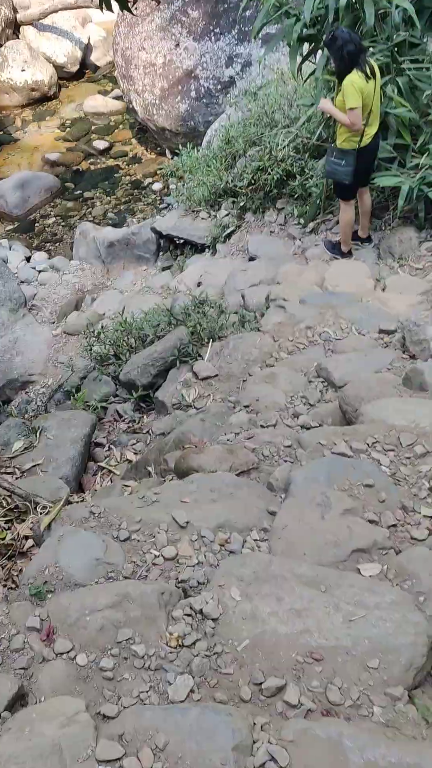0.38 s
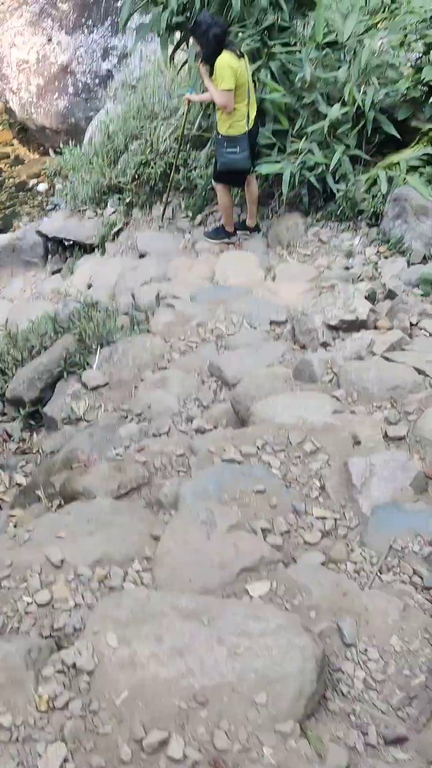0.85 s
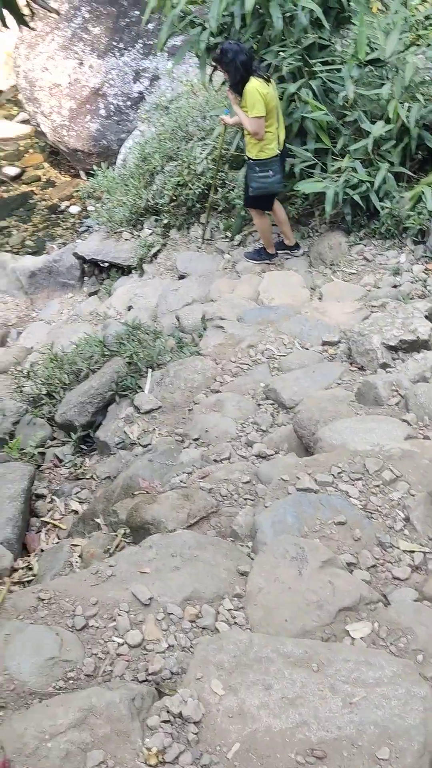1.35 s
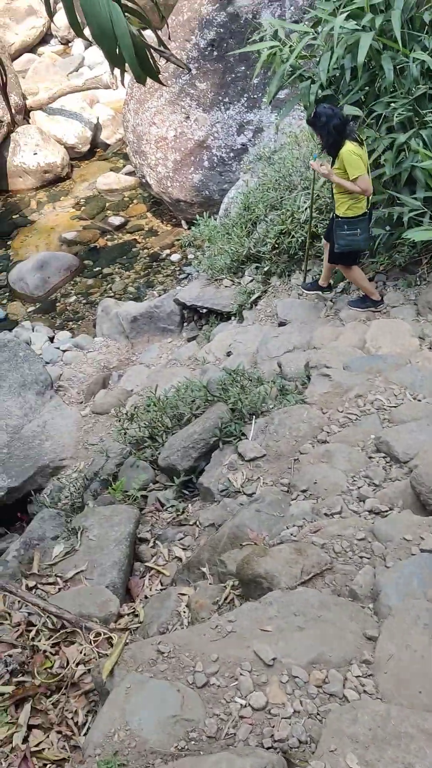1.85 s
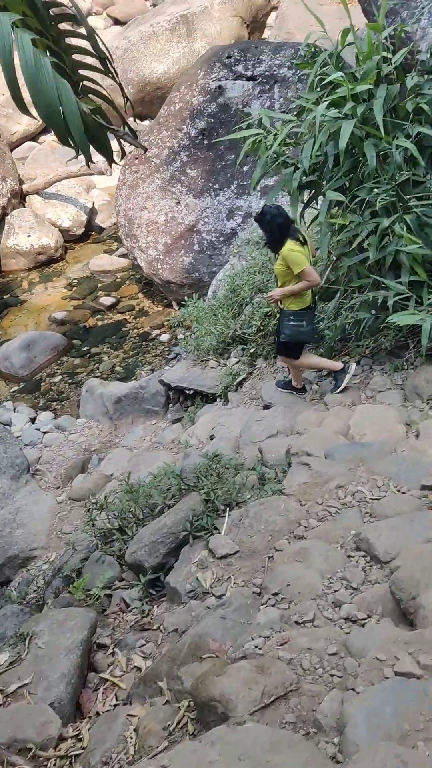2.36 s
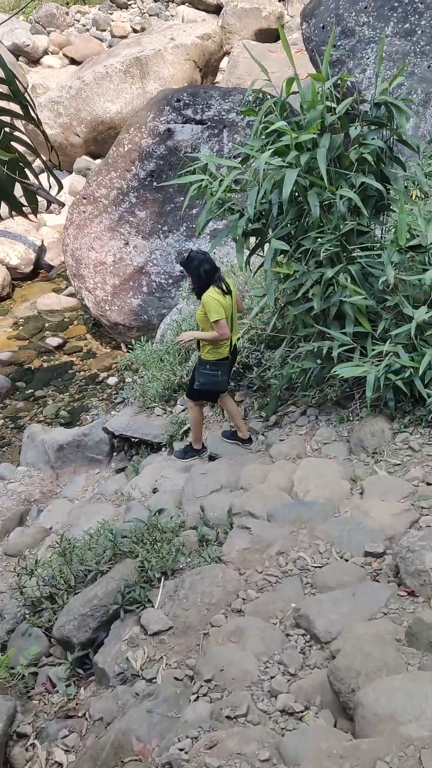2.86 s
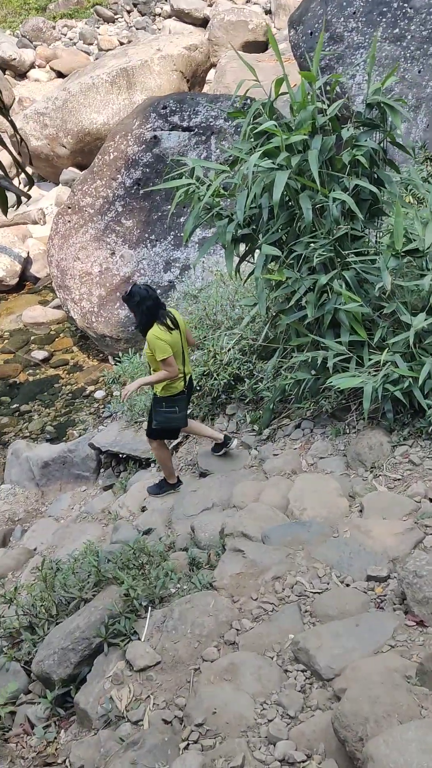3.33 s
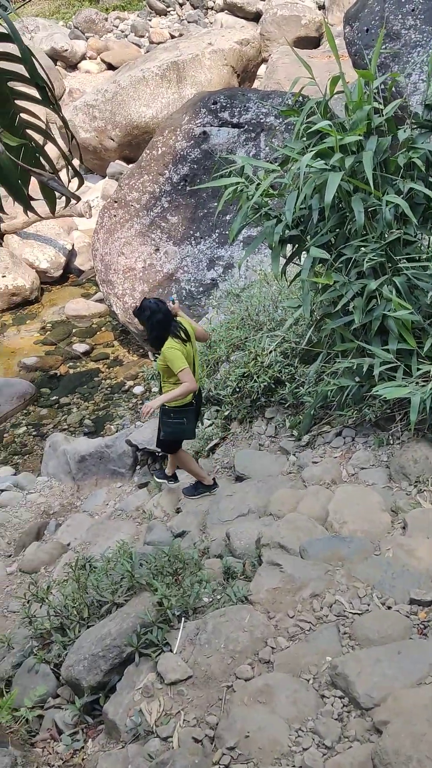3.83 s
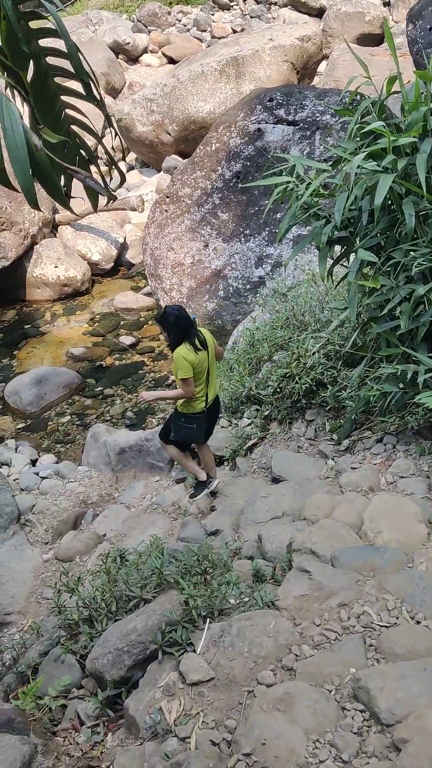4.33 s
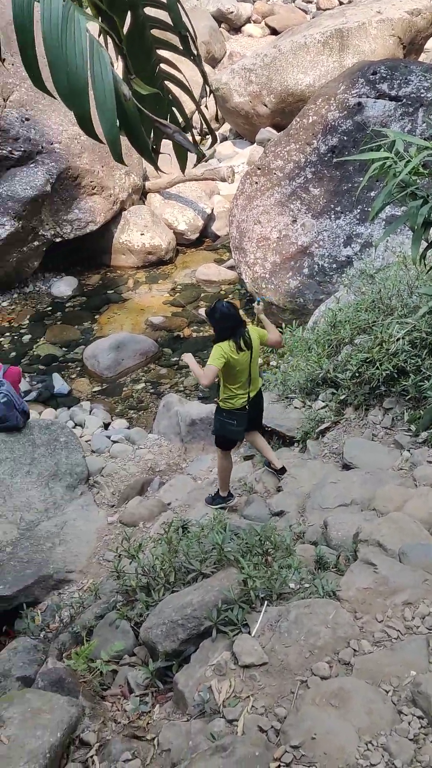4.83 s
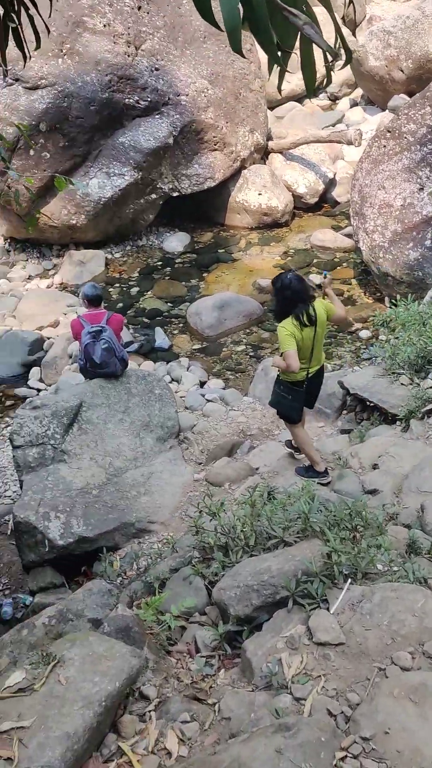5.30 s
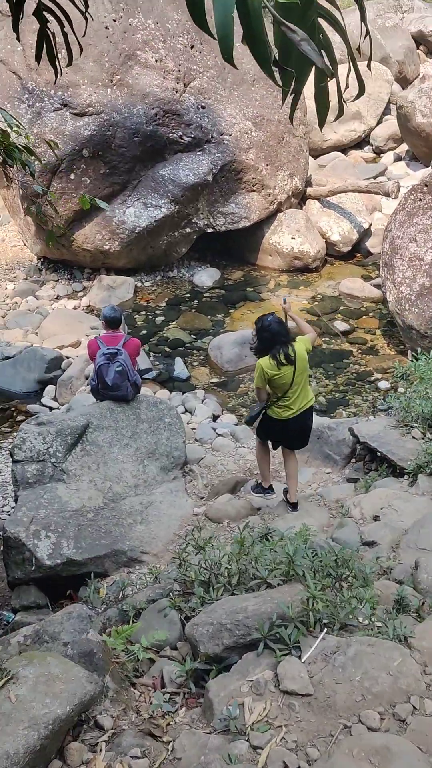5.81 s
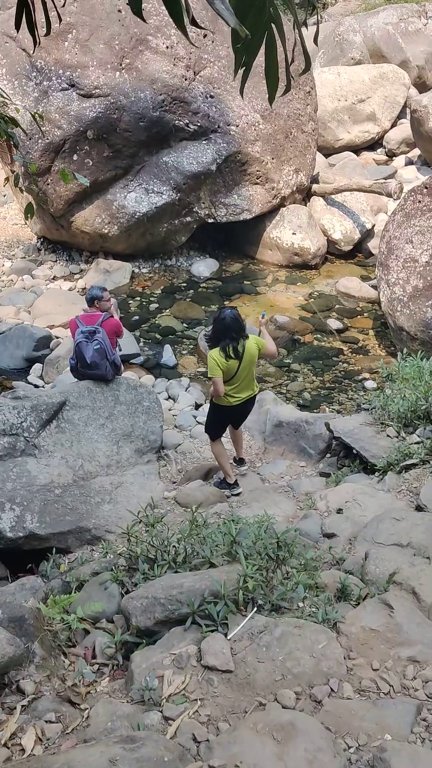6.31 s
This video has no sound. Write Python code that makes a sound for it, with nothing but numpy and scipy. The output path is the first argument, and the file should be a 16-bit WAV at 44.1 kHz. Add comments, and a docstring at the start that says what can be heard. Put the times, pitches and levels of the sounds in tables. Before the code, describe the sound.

Cicadas hold a dense, bright drone outdoors, a nearer singer leaning left. Beneath it someone steps over loose rocks, close to the microphone: heavy blows, tipping stones, clacks and scraping grit, with uneven pauses. Wind bumps the microphone early, then weakly later. A very thin high insect buzz comes and goes past the middle, over barely audible far water.

```python
"""A stony trail by a stream bed: shoes come down on loose stones that rock, under steadily droning cicadas.
Each footfall is a blow and a dying rattle that ring as a dull thud, a knock of stones and a clack.
Random clicks make the grit that crunches around it, the nearer cicada and a very high insect buzz.
Shaped noise makes the far cicadas, far water and light wind; short pulses add a fluttering low wind buffet
near the start and a few weaker thumps later. Sound from the ground reaches the right microphone port first."""
import sys
import numpy as np
from scipy import signal
from scipy.io import wavfile
from scipy.ndimage import uniform_filter1d

SR = 44100
rng = np.random.default_rng(int(sys.argv[2]) if len(sys.argv) > 2 else 0)


def transcribe(signal):
    """Save signal, clipped to [-1, 1], as a 16-bit WAV file at the path in sys.argv[1]."""
    frames = np.atleast_2d(signal).T
    limited = np.clip(frames, -1, 1)
    pcm = np.round(limited * 32767).astype(np.int16)
    wavfile.write(sys.argv[1], SR, pcm)


def volts_from_db(level):
    """Convert decibel levels to linear amplitude ratios."""
    exponent = np.asarray(level, float) / 20
    return 10 ** exponent


N = 283682  # length of the scene in samples
LAG_S = 19 / 44100  # the left port hears later by this many seconds; the ports are about 15 cm apart

# what knocking stones ring with: f/Hz, width/Hz, relative level/dB
KNOCK = [(421, 133, 0), (598, 153, 3), (828, 295, -3)]
# what the stone edges ring with: f/Hz, width/Hz, relative level/dB
CLACK = [(1090, 200, -2.5), (1441, 354, 3.5), (1965, 540, 5), (2816, 360, -0.5), (3600, 610, -1),
         (5580, 690, -9.5), (8800, 1300, -12)]


def evened(x):
    """Scales a sound to an rms of 1."""
    return x / np.sqrt(np.mean(x ** 2) + 1e-20)


def curve(rows):
    """Draws straight lines through a table of times and values, one value per sample."""
    s, value = np.transpose(rows)
    return np.interp(np.arange(N) / SR, s, value)


def read(points, hz):
    """Reads a table of frequencies and values along a log frequency axis."""
    f, value = np.transpose(points)
    return np.interp(np.log(hz + 1), np.log(f + 1), value)


def drift(samples):
    """A slow random wander: noise averaged over some samples, with an rms of 1."""
    return evened(uniform_filter1d(rng.standard_normal(N), size=samples))


def ring(x, modes, size=1.):
    """Lets x strike a set of steep resonances; larger stones ring lower."""
    t = np.arange(2048) / SR
    shape = 0
    for hz, width, db in modes:
        # each resonance swells and dies
        swell = t * np.exp(-np.pi * width * t)
        shape = shape + volts_from_db(db) * width ** 1.5 / hz * swell * np.sin(2 * np.pi * hz / size * t)
    # the slope of the sum carries no steady push
    return signal.oaconvolve(x, np.diff(shape))[:len(x)]


def ports(x, pan_db=0.):
    """Places a near source at both ports: the left one hears it a little late."""
    late = np.concatenate([np.zeros(round(LAG_S * SR)), x])[:len(x)]
    return np.array([late * volts_from_db(pan_db / 2), x * volts_from_db(-pan_db / 2)])


def field(spectrum, patchy_db, flicker_db, likeness, lean=((1, 0), (2, 0)), size=1024):
    """Wide noise of many far sources, with drifting patches and a shared flicker."""
    # how alike the two ports are before the likeness factor: f/Hz, share (1 = the same)
    alike = [(60, 1), (150, 1), (350, 1), (700, 0.71), (1500, 0.08), (3000, 0.08), (15000, 0.12)]
    frames, hz = 4 * N // size + 5, np.fft.rfftfreq(size, 1 / SR)
    a, b, c, d, patches = rng.standard_normal((frames, len(hz), 5)).T
    patches = uniform_filter1d(patches, size=14, axis=0)  # across frequency
    patches = evened(uniform_filter1d(patches, size=12288 // size, axis=1))  # across time
    flicker = evened(uniform_filter1d(rng.standard_normal(frames), size=5120 // size))

    same = np.clip(likeness * read(alike, hz), 0, 1)[:, None]
    right, separate = a + 1j * b, c + 1j * d
    late = np.exp(-2j * np.pi * hz * LAG_S)[:, None]
    left = same * late * right + np.sqrt(1 - same ** 2) * separate
    z = np.array([left, right])
    z *= volts_from_db(read(spectrum, hz)[:, None] + patchy_db * patches + flicker_db * flicker)
    z *= volts_from_db(np.outer([.5, -.5], read(lean, hz)))[..., None]
    return evened(signal.istft(z, nperseg=size, noverlap=size - size // 4)[1][:, :N])


def clicks(per_s, spread_db):
    """Sparse clicks of random sign; a few are large."""
    size = volts_from_db(spread_db * np.minimum(rng.exponential(1, N), 4))
    sign = rng.choice([-1., 1.], N)
    return size * sign * (rng.random(N) < per_s / SR)


def steps():
    """A blow, then a dying rattle of stones, rings through ground, stones and stone edges."""
    # footfalls and stone knocks, peaks before panning: t/s, thud/dB, knock/dB, clack/dB, stone size
    footfalls = [(0.168, -32.5, -23.5, -24.5, 2.1), (0.221, -30, -34.5, -27.5, 1.22),
                 (0.812, -40, -35.5, -40, 1.22), (0.845, -26, -27.5, -35, 2.7),
                 (0.991, -55, -43, -15.5, 1.05), (1.032, -44, -50, -28.5, 1.57),
                 (1.154, -37.5, -40.5, -40, 0.87), (1.24, -54, -57, -32, 0.96),
                 (1.913, -26, -25.5, -24, 1.18), (1.947, -39, -41, -31, 1.7), (1.998, -40, -46, -48, 0.62),
                 (2.093, -52, -52, -34, 1.23), (2.217, -64, -42, -33, 0.47),
                 (2.266, -60, -39.5, -33.5, 1.22), (2.349, -39.5, -34, -42, 1.2),
                 (2.377, -31.5, -33, -28.5, 1.5), (2.488, -57, -39, -34.5, 1.16),
                 (2.817, -39.5, -56, -51, 1.1), (3.003, -27, -33, -26, 1.28),
                 (3.163, -39, -36.5, -43, 0.91), (3.215, -43, -34.5, -32, 2.2),
                 (3.26, -37, -34, -26.5, 0.96), (3.443, -33, -42.5, -19.5, 0.9),
                 (3.82, -35, -43, -49, 0.78), (3.936, -36, -36.5, -30.5, 1.08),
                 (4.06, -40.5, -38, -38, 1.2), (4.289, -62, -42, -29.5, 1), (4.575, -39, -46, -46, 0.93),
                 (4.796, -52, -48, -27, 1.9), (4.935, -55, -41, -34, 0.7), (5.125, -42, -31.5, -35.5, 1.27),
                 (5.258, -42.5, -42, -33, 2), (5.412, -27, -25, -23, 1.33), (5.46, -36, -35, -47, 1.2),
                 (5.502, -37.5, -41, -44, 0.7), (5.917, -34, -26, -27, 1.61), (5.975, -34, -42, -42, 0.69),
                 (6.155, -49, -44, -23.5, 0.75), (6.203, -56, -53, -36, 0.98)]
    # what the ground rings with: f/Hz, width/Hz, relative level/dB
    thud = [(92, 93, -2), (151.6, 142, 2), (249, 64, -16.5)]
    # the first contact, too short to ring: f/Hz, width/Hz, relative level/dB
    crack = [(1130, 950, 0)]
    crack_db = -5  # against the average of knock and clack
    # the rattle falls 30 dB in this time after a -39.5 dB thud, slower after a heavier one
    rattle_s, rattle_s_per_db = 0.021, .0008
    out, t = np.zeros((2, N + SR)), np.arange(SR // 5) / SR
    for s, thud_db, knock_db, clack_db, size in footfalls:
        rattle, chance = rng.standard_normal((len(t), 2)).T
        fall_s = np.clip(rattle_s + rattle_s_per_db * (thud_db + 39.5), .005, .3)
        rattle *= 0.3 * (abs(chance) > 1.9) * volts_from_db(-30 * t / fall_s)
        rattle[:1] += 1.5  # the blow itself
        size = np.clip(size, .6, 2.5)
        # stone size shifts the clack most and the thud least
        parts = ((thud, thud_db, size ** 0.067),
                 (KNOCK, knock_db, size ** 0.2),
                 (CLACK, clack_db, size),
                 (crack, (knock_db + clack_db) / 2 + crack_db, 1.))
        sound = np.zeros(len(t))
        for modes, db, factor in parts:
            rung = ring(rattle, modes, factor)
            sound += volts_from_db(db) * rung / abs(rung).max()
        out[:, round(s * SR):][:, :len(t)] += ports(sound, -2.5)
    return out[:, :N]


def grit():
    """Many small stones crack and slide: random clicks ring through stones of three sizes."""
    # crunch under the soles: t/s, relative level/dB
    crunch = [(0, -64), (.15, -49.5), (.75, -61.5), (1.13, -50), (1.5, -60), (2.35, -50.5), (2.81, -60),
              (3.3, -58.5), (3.9, -55), (4.37, -66), (4.89, -54), (5.35, -57), (5.45, -49), (5.62, -57),
              (6.05, -46), (6.43, -54.5)]
    edges = sum(ring(clicks(500, 4.1), CLACK, size) for size in (.9, 1.2, 1.6))
    bodies = sum(ring(clicks(150, 4.8), KNOCK, size) for size in (.8, 1.1, 1.5))
    stones = evened(edges) + volts_from_db(-2) * evened(bodies)
    return ports(volts_from_db(curve(crunch) - 4.5) * stones, -0.8)


def slope(x):
    """Short scattered echoes off rocks, different at each port, die away by 60 dB in 0.11 s."""
    t = np.arange(SR // 4) / SR
    taps = rng.standard_normal((len(t), 2)).T * volts_from_db(-60 * t / 0.11)
    taps *= t > .003  # the echoes start after 3 ms
    return signal.oaconvolve(x, taps / np.linalg.norm(taps[0]), axes=1)[:, :N]


def near_cicada():
    """A nearer singer on the left: clicks in throbs ring its tymbal, a small drum."""
    # resonances of the tymbal: f/Hz, width/Hz, relative level/dB
    tymbal = [(5930, 1170, -6.5), (8430, 2100, -25.5)]
    throb = volts_from_db(4.2 * drift(600))
    t = np.arange(-200, 200) / SR
    burst = 0
    for hz, width, db in tymbal:
        # a click is a short bell-shaped burst at each resonance
        bell = np.exp(-(2 * width * t) ** 2)
        burst = burst + volts_from_db(db) * width * bell * np.cos(2 * np.pi * hz * t)
    # the ports catch different clicks in the same throbs
    trains = [clicks(450, 1.4) * throb for _ in range(2)]
    song = [evened(signal.oaconvolve(train, burst, "same")) for train in trains]
    return np.array(song) * volts_from_db([[6.0], [-1.5]])


def cicadas():
    """Two far choruses blurred to noise, mixed with the nearer singer."""
    # the high song swells towards the end: t/s, relative level/dB
    high_song = [(0, -31), (.6, -33), (1.5, -34), (4.3, -33.5), (5, -30.5), (5.6, -30), (5.9, -29),
                 (6.25, -28.5), (6.43, -31)]
    # the low chorus: t/s, relative level/dB
    low_song = [(0, -42.5), (.5, -43.5), (1, -44), (6.43, -42)]
    # spectrum of the high chorus: f/Hz, relative level per Hz/dB
    high_spectrum = [(2350, -43.5), (4100, -18.5), (4500, -12), (5220, -10), (5720, -3), (6120, 0),
                     (6850, -15), (7340, -30), (8220, -23), (10500, -37), (11200, -42.5), (12400, -37),
                     (13700, -38), (14600, -52), (15500, -68)]
    # spectrum of the low chorus: f/Hz, relative level per Hz/dB
    low_spectrum = [(1350, -40), (2300, -28.5), (2500, -16), (2860, 1), (3060, -0.5), (3310, 1), (3700, 2),
                    (4100, -10), (4500, -5.5), (5590, -18), (9460, -120)]
    # where the high chorus sits: f/Hz, left against right/dB
    high_lean = [(4000, -0.5), (5200, 6), (6600, 2.5), (7600, -3), (10000, 2.5), (14000, 4.5)]
    high_db = curve(high_song)
    # the near singer's share is 0.11 at -31.5 dB, larger when the song is louder
    share = np.clip(0.11 + 0.01 * (high_db + 31.5), 0, 1)
    far = field(high_spectrum, 1.2, 0.73, 0.37, high_lean) * volts_from_db(2.5)
    low = field(low_spectrum, 0.77, 0.5, 0.52) * volts_from_db([[2.2], [3.2]])
    high = np.sqrt(1 - share) * far + np.sqrt(share) * near_cicada()
    return volts_from_db(high_db) * high + volts_from_db(curve(low_song)) * low


def wind():
    """Lumpy rumble, nearly unrelated at the two ports, with one fluttering buffet and weaker thumps."""
    # wind at the ports before the balance: t/s, level/dB
    strength = [(0, -54), (.1, -44), (.25, -30), (.35, -38), (.45, -43), (.72, -52), (.86, -46),
                (1.1, -49.5), (1.55, -57.5), (1.95, -53), (2.13, -56), (2.44, -37), (2.62, -53),
                (2.75, -56), (3.1, -54), (3.33, -49), (3.75, -52), (4.9, -59), (5.15, -48), (5.55, -60),
                (5.75, -43.5), (5.91, -51), (6.05, -47), (6.43, -51)]
    # spectrum of the rumble: f/Hz, relative level per Hz/dB
    rumble = [(15, 5), (28, 5), (50, -5), (75, -10.5), (130, -24), (250, -60), (500, -72)]
    # low wind thumps, the first four the swings of one buffet: t/s, peak/dB, left against right/dB
    thumps = [(0.2, -25.5, -25), (0.231, -16.5, -10), (0.273, -24, -5), (0.296, -23, 8), (2.401, -38, -21),
              (2.587, -41, -20), (5.99, -36, -10), (6.042, -32, -2)]
    lee_db, veer_db = -6, 7  # the left port lies in the lee; the wind veers at random
    thump_s, thump_s_per_db = .0052, .00022  # length at -22 dB; weaker thumps are slower
    level_db = curve(strength)
    pan_db = lee_db + veer_db * drift(5000)
    balance = volts_from_db([level_db + pan_db / 2, level_db - pan_db / 2])
    out = field(rumble, 2.8, 1.5, 0.31, size=4096) * balance
    t = np.arange(N) / SR
    for s, peak_db, side_db in thumps:
        u = (t - s) / max(thump_s - thump_s_per_db * (peak_db + 22), .002)
        thump = (u ** 2 - 1) * np.exp(-u ** 2 / 2)
        out += thump * volts_from_db([[peak_db + side_db / 2], [peak_db - side_db / 2]])
    return out


def high_buzz():
    """A small insect buzzes for a while: clumped clicks ring near the top of hearing."""
    # the buzz before the balance: t/s, level/dB
    buzz = [(3.3, -66), (3.55, -64), (4.2, -62), (4.6, -58), (4.75, -63), (5.3, -66), (5.7, -65),
            (5.9, -80)]
    throb = volts_from_db(3.0 * drift(900))
    mode = [(14500, 2000, 0)]  # f/Hz, width/Hz, relative level/dB
    pair = [evened(ring(clicks(1500, 3.4) * throb, mode)) for _ in range(2)]
    return volts_from_db(curve(buzz)) * volts_from_db([[1.5], [-1.5]]) * np.array(pair)


def far_water():
    """Far water, a low noise of many sources that is much alike at both ports in the bass."""
    # spectrum of the water: f/Hz, relative level per Hz/dB
    water = [(35, -18), (60, -3.5), (118, -8.5), (318, 0), (439, -1.5), (505, -3.5), (1220, -5.5),
             (1420, -8), (2400, -10), (3120, -54), (5280, -120)]
    return volts_from_db(-51.5) * field(water, 2.1, 0.58, 0.87)


def scene():
    """Adds up all sources at the two ports."""
    ground = steps() + grit()
    echoes = volts_from_db(-2.5) * slope(ground)
    return ground + echoes + cicadas() + wind() + high_buzz() + far_water()


def low_pass(x):
    """Removes everything above the highest recorded frequency."""
    return signal.sosfilt(signal.butter(12, 15500, fs=SR, output="sos"), x)


def record(dry):
    """The microphones weaken slow pushes of air below 18 Hz."""
    low_cut = signal.butter(2, 18, "highpass", fs=SR, output="sos")
    mix = signal.sosfilt(low_cut, dry)
    return low_pass(mix)


dry = scene()
out = record(dry)
transcribe(out)
```